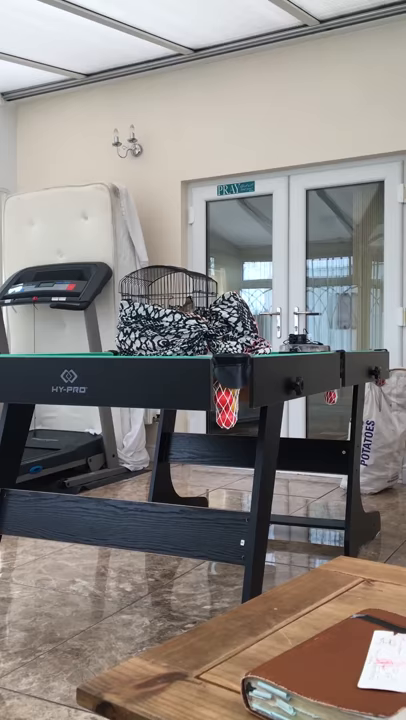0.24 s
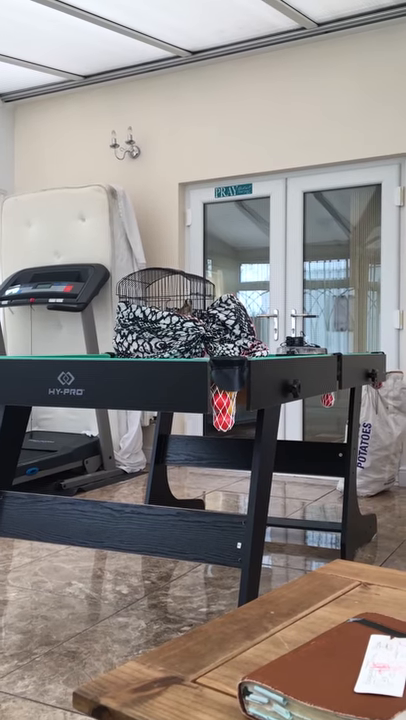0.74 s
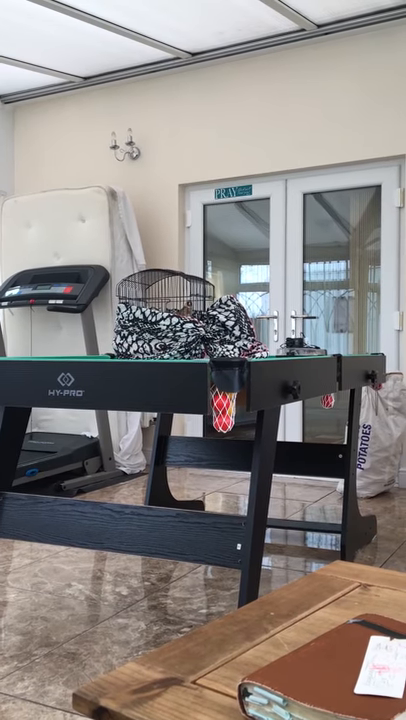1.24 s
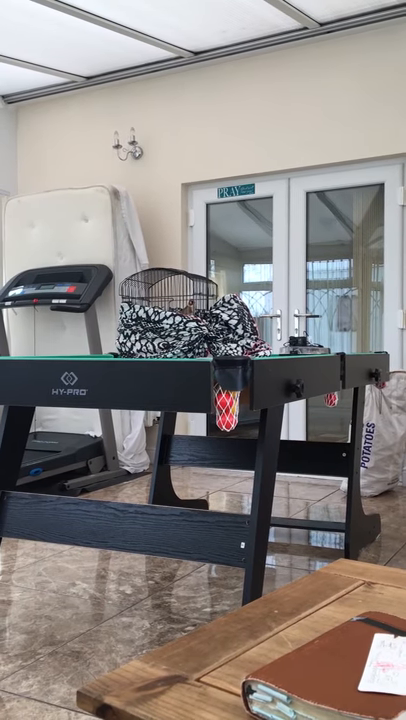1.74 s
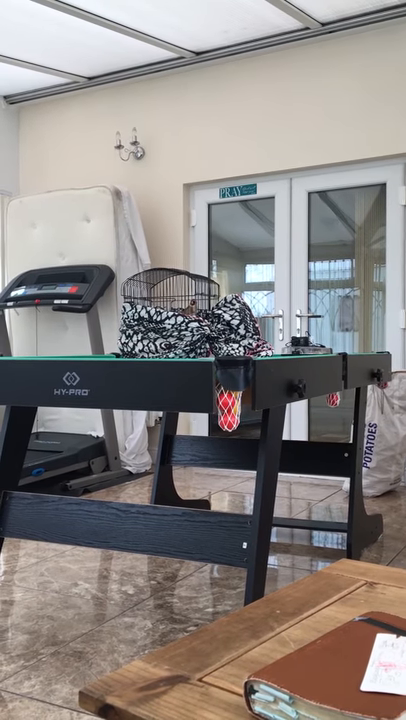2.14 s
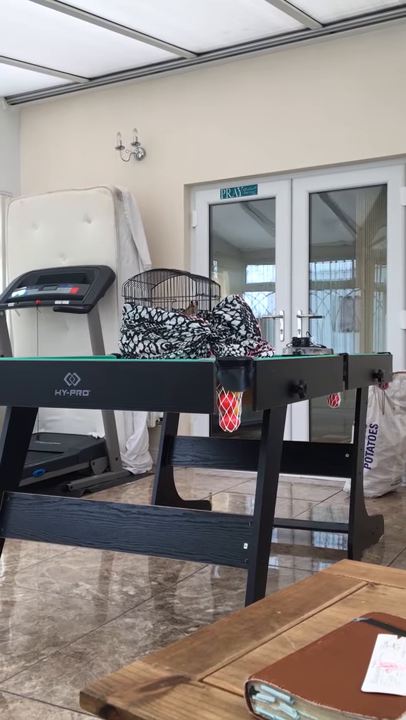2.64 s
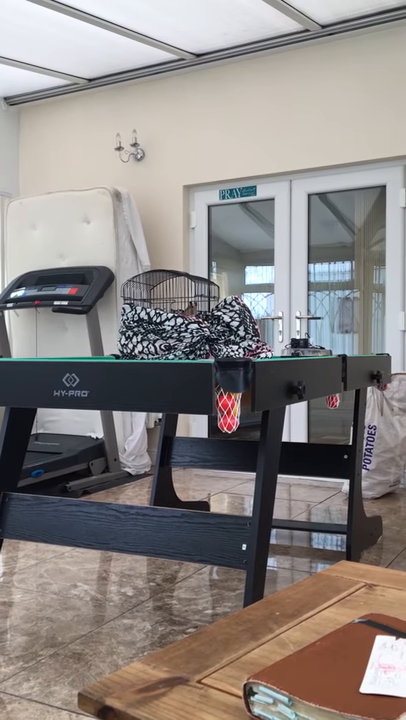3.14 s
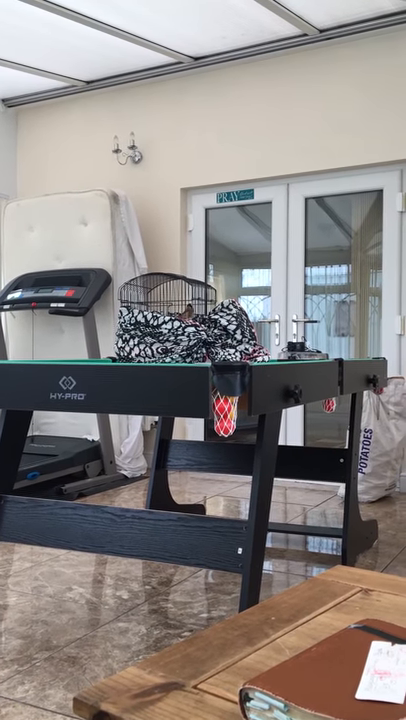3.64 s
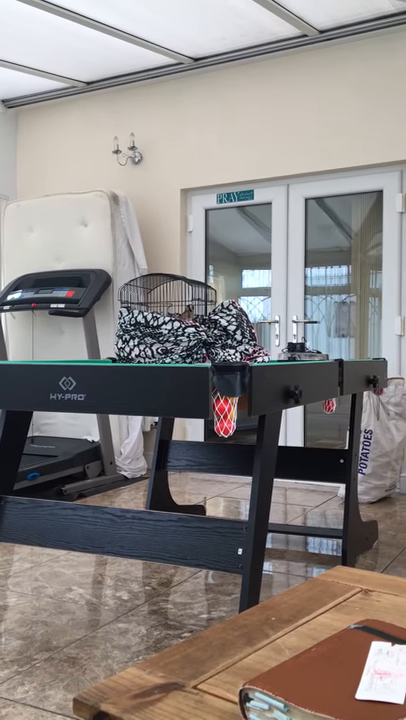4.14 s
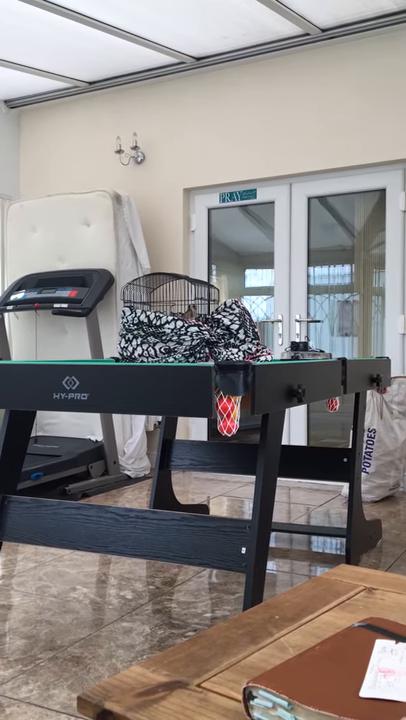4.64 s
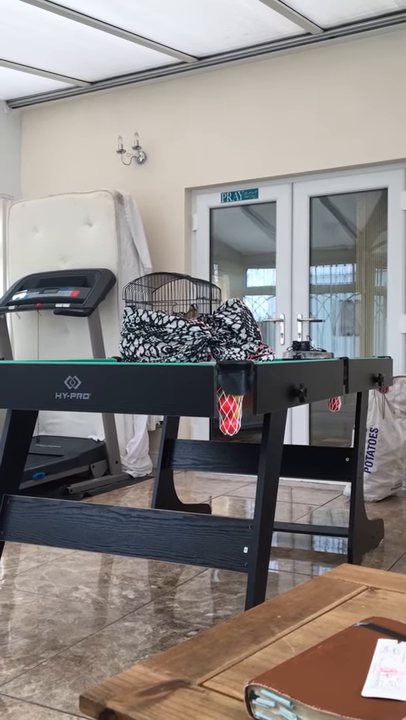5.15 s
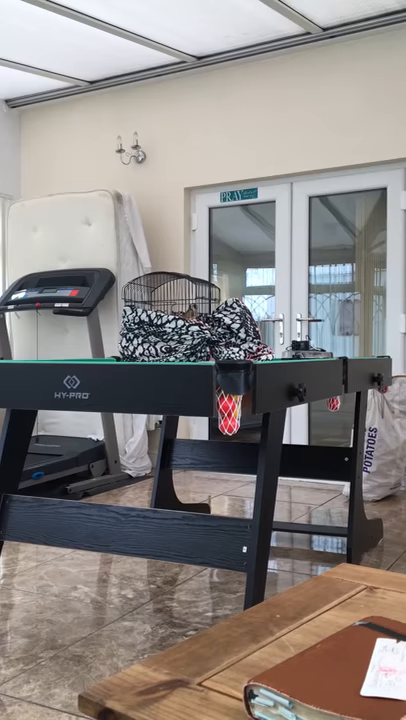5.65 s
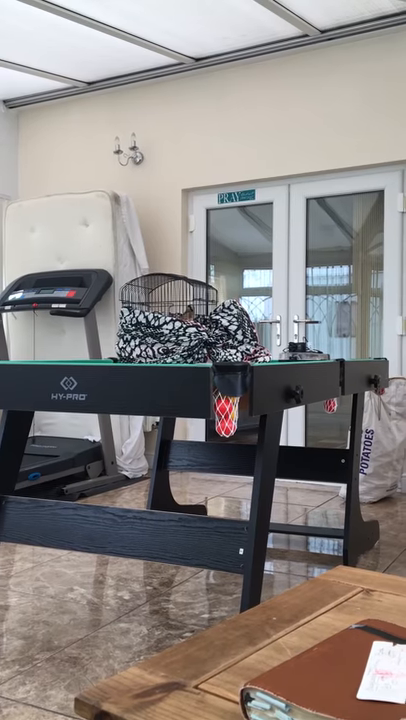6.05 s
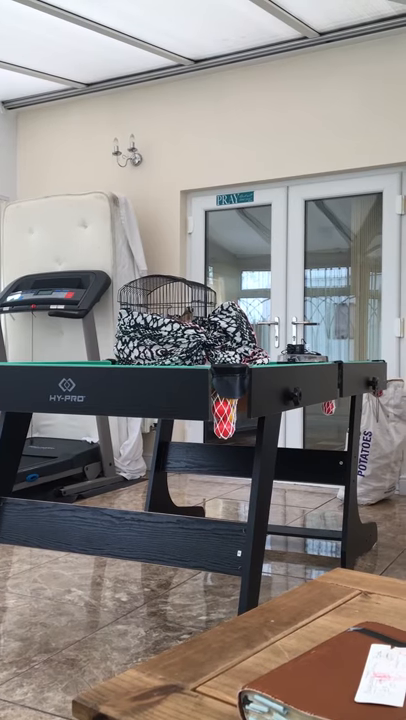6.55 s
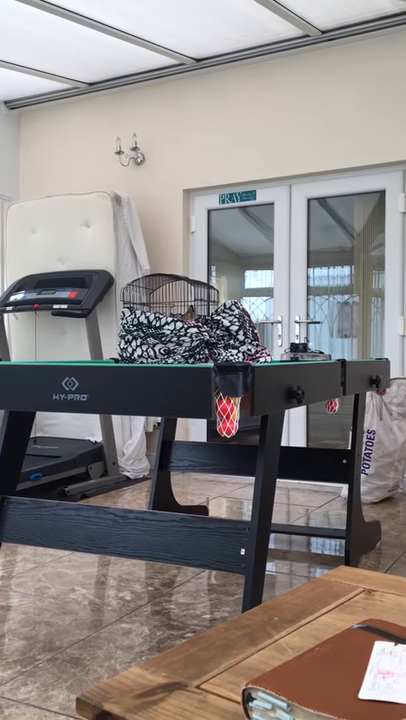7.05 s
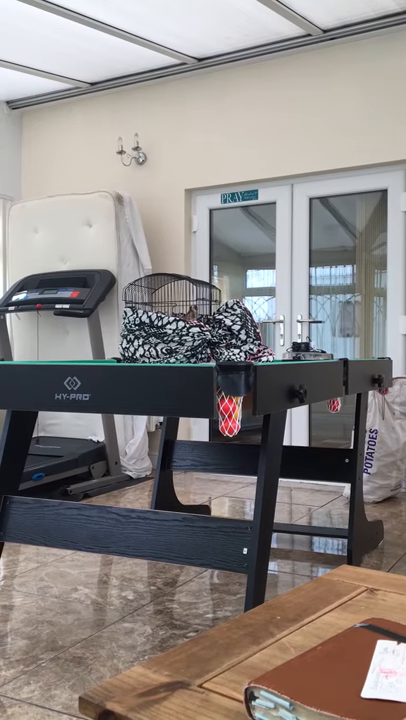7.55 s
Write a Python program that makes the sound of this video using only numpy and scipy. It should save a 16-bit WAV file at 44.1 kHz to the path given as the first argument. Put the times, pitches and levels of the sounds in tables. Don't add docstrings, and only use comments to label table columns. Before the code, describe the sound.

Lively, high-pitched finch twittering in changing bouts with tiny pauses: sparse chirps, four brief buzzes, a piercing pip, an even two-note trill, hoarse rasps and whistles. Midway, something dull knocks across the room. The song resumes with a longer buzz, repeated rolling syllables, falling churrs and a quick rattle. The bird is a few metres from a phone microphone, with bright short room echo, quiet low rumble, faint hum and distant traffic behind glass.

```python
import sys
import numpy as np
from scipy import signal
from scipy.fft import rfft, irfft
from scipy.io import wavfile
from scipy.ndimage import uniform_filter1d

SR = 44100
rng = np.random.default_rng(int(sys.argv[2]) if len(sys.argv) > 2 else 0)


def int16_out(signal):
    q = np.round(np.clip(np.atleast_2d(signal).T, -1, 1) * 32767)
    wavfile.write(sys.argv[1], SR, q.astype(np.int16))


def linear_from_db(decibels):
    return 10 ** (np.asarray(decibels, float) / 20)


N = 343098


def read(points, hz):
    point_hz, value = np.transpose(points)
    return np.interp(np.log(hz + 1), np.log(point_hz + 1), value)


def evened(x):
    return x / np.sqrt(np.mean(abs(x) ** 2) + 1e-20)


def add(mix, start_s, sound):
    part = mix[round(start_s * SR):][:len(sound)]
    part += sound[:len(part)]


def drift(size, seconds):
    width = int(seconds * SR)
    once = uniform_filter1d(rng.standard_normal(size), width)
    return evened(uniform_filter1d(once, width))


def coloured(shape, size):
    hz = np.fft.rfftfreq(size, 1 / SR)
    return evened(irfft(rfft(rng.standard_normal(size)) * linear_from_db(read(shape, hz)), size))


def spin(hz):
    return np.exp(2j * np.pi * np.cumsum(hz) / SR)


OVERTONES_DB = [-25.5, -36]
# pitch_hz, level_db
THROAT = [(1500, -3.5), (2500, -3), (3500, -1.5), (4700, 0), (6000, 1.5), (7500, -1), (9000, 0), (11500, 5),
          (13500, 3), (15500, -2.5)]


def finch():
    uneven = drift(N, 0.00347)
    voice = single_notes() + repeated_syllables() + warbled_notes(uneven) + buzzes(uneven)
    voice = voice * linear_from_db(1.1 * drift(N, .004))
    turn = voice / np.sqrt(uniform_filter1d(abs(voice) ** 2, size=132) + 1e-12)
    overtones = voice * (linear_from_db(OVERTONES_DB[0]) * turn + linear_from_db(OVERTONES_DB[1]) * turn ** 2)
    lowpass = signal.butter(N=8, Wn=16000, fs=SR, output="sos")
    sung = np.sqrt(2) * (voice.real + signal.sosfilt(lowpass, overtones.real))
    return irfft(rfft(sung) * linear_from_db(read(THROAT, np.fft.rfftfreq(N, 1 / SR))), N)


def glide(length, start_hz, end_hz, bend, db):
    edge_s = 0.001
    u = np.linspace(0, 1, max(round(length * SR), 16))
    hz = end_hz + (start_hz - end_hz) * (1 - u) ** bend
    puff = np.sin(np.pi * u) ** 0.57
    puff = puff * signal.windows.tukey(len(u), min(2 * edge_s / length, 1))
    return linear_from_db(db) * puff * spin(hz)


# start_s, length_s, start_hz, end_hz, level_db
FLICKS = [(.132, 0.048, 3040, 4300, -48), (.375, .029, 3400, 4820, -47), (.376, .012, 4800, 5680, -49),
          (1.606, 0.021, 1850, 3950, -45), (1.814, 0.021, 1870, 4040, -39), (1.945, 0.06, 2200, 3810, -47),
          (2.037, 0.013, 2930, 6600, -41.5), (4.348, 0.028, 6700, 12500, -56),
          (4.349, 0.011, 6300, 8300, -65), (4.462, 0.026, 2720, 3690, -34.5),
          (2.293, 0.017, 1510, 4860, -41), (2.357, .025, 4420, 8400, -38.5),
          (2.362, 0.036, 4650, 7000, -47), (3.654, 0.019, 2400, 4250, -39),
          (3.785, 0.024, 2640, 4720, -30.5), (3.838, 0.014, 5200, 7540, -42.5),
          (4.351, 0.034, 3220, 6600, -39.5), (4.347, 0.039, 4790, 6800, -45), (4.558, .12, 1924, 2510, -49),
          (5.082, 0.03, 5200, 5546, -37.5), (5.497, 0.043, 2240, 3110, -38.5),
          (5.734, 0.031, 5230, 5520, -33), (5.802, 0.021, 2320, 3190, -41), (5.821, 0.016, 2400, 3160, -38),
          (6.406, .014, 3000, 6000, -42), (7.581, 0.024, 5720, 5950, -45), (7.695, .03, 6180, 6540, -46)]
RISES = [(.113, 0.019, 2350, 3070, -63.5), (.027, 0.012, 3080, 5370, -51), (.239, 0.018, 4130, 5110, -44.5),
         (.48, 0.035, 2560, 4560, -46.5), (.593, 0.02, 3300, 4850, -38.5),
         (1.633, 0.024, 2910, 3950, -38.5), (1.832, 0.036, 3590, 5290, -34.5),
         (1.965, 0.014, 2980, 3510, -37.5), (2.299, 0.02, 3160, 5060, -32.5),
         (2.362, 0.041, 3250, 4770, -42.5), (2.365, 0.11, 2540, 3700, -52),
         (2.433, 0.0028, 3820, 6600, -36), (3.76, 0.027, 2130, 3110, -46.5),
         (4.714, 0.0134, 3030, 4980, -34.5), (4.828, 0.01, 2070, 5200, -38),
         (5.581, 0.019, 2750, 4920, -33.5), (5.576, 0.026, 4500, 8720, -58),
         (6.418, 0.015, 5940, 11900, -53.5), (6.433, 0.031, 6200, 7730, -40.5),
         (7.696, 0.018, 4440, 5310, -41), (7.694, 0.021, 8870, 10500, -55)]
DROPS = [(.881, .012, 3330, 2280, -56), (1.214, .016, 2990, 2110, -56), (1.379, .016, 2980, 2110, -54.5),
         (.697, 0.056, 5670, 4925, -38), (.689, 0.067, 6870, 6280, -39.5),
         (1.539, 0.025, 7160, 6000, -42.5), (1.543, 0.029, 5650, 4590, -43.5),
         (3.867, 0.097, 8540, 6170, -36), (4.769, 0.018, 7640, 6530, -36.5),
         (5.632, 0.052, 8300, 6270, -36.5), (5.636, 0.057, 6300, 5070, -50.5),
         (5.731, 0.03, 4770, 4410, -40)]
SLIDES = [(.238, 0.029, 5730, 5930, -55), (.642, 0.031, 8170, 7860, -48.5),
          (1.701, 0.0246, 2530, 2770, -49.5), (1.773, .011, 5600, 5880, -48),
          (1.772, 0.011, 7220, 7260, -48), (4.372, 0.019, 6480, 6560, -36),
          (2.365, 0.039, 1350, 1210, -61.5), (2.451, .11, 4690, 4094, -40), (2.455, .14, 9280, 8010, -46.5),
          (2.466, .115, 7930, 6440, -47.5), (2.478, .12, 3180, 2200, -55.5),
          (5.125, 0.072, 5500, 5470, -47), (3.607, .03, 2410, 1900, -49), (3.611, 0.028, 4660, 3880, -52.5),
          (4.77, 0.032, 5800, 5500, -51), (7.578, 0.019, 6620, 7000, -42), (7.584, 0.019, 7640, 8020, -66)]
SCOOPS = [(2.027, 0.017, 1880, 4800, -49.5), (2.027, .015, 3500, 9800, -44),
          (2.027, .014, 5800, 12000, -51)]


def single_notes():
    voice = np.zeros(N, complex)
    for notes, bend in ((FLICKS, 2.2), (RISES, 1.15), (DROPS, 2.9), (SLIDES, 1.05), (SCOOPS, .3)):
        for start_s, length, start_hz, end_hz, db in notes:
            add(voice, start_s, glide(length, start_hz, end_hz, bend, db))
    return voice


def fan():
    length_s, from_hz, to_hz = .036, 620, 1080
    return [(0, length_s, k * from_hz, k * to_hz, -51 - 1.22 * k) for k in range(3, 12)]


TRILL = [(0, 0.0076, 8020, 6340, -34.5)]
TRILL_LOW = [(.013, .022, 4030, 2758, -33.5)]
TRILLED = [(2.6663, -1.3, 1.038), (2.7383, -1, 1.015), (2.8092, -0.5, 1.015), (2.882, -1, 1.013),
           (2.9517, -1.5, 1.045), (3.023, 0.2, 1.02), (3.0955, 0.79, 1.033), (3.1701, 0.3, 1.033)]
ROLL_UP = [(0.00023, 0.0107, 3600, 6690, -35)]
ROLL_DOWN = [(.023, 0.0354, 3760, 3150, -41), (0.036, 0.0255, 6080, 5320, -36.5),
             (0.07, 0.0171, 4700, 4340, -47), (.075, 0.027, 4330, 4190, -34.5),
             (.067, 0.0242, 2840, 2560, -47.5), (.041, 0.019, 2610, 2210, -53),
             (.076, 0.01, 1800, 1790, -59.5)]
ROLLED = [(5.878, -0.91, 0.97), (6.015, -0.21, 1.02), (6.148, 0.24, 1.0), (6.282, 1.6, 0.99)]
KINK = [(.092, 0.011, 5060, 4410, -30.5)]
FALL = [(.108, 0.036, 4130, 3103, -37.5), (.124, 0.0172, 3400, 2780, -40.5),
        (.143, 0.01087, 3050, 2200, -53.5)]
FALLEN = [(6.556, 0.016, 0.98), (6.786, 0, 0.96)]
RATTLE = [(0, 0.0212, 2716, 1554, -48), (0, 0.0153, 5110, 3250, -47)]
RATTLED = [(7.003, -2.5, 0.92), (7.053, -0.5, 1), (7.1, 1, 0.96), (7.144, 1.5, 1.03), (7.195, 0.5, 0.98)]
UPSWEEP = [(0.001, 0.0045, 5650, 12000, -48)]
UPSWEPT = [(5.18, 0, 1.0), (5.195, -4, 1.1), (5.21, -4, 1.05), (5.226, -4, 1.0), (5.243, -3, 1.1),
           (5.26, -5, 1.12)]
FANNED = [(7.261, 0, 0.95)]


def repeated_syllables():
    voice = np.zeros(N, complex)
    songs = ((TRILL, TRILLED, 2.26), (TRILL_LOW, TRILLED, 1.15), (ROLL_UP, ROLLED, 2.2),
             (ROLL_DOWN, ROLLED, 1.2), (KINK, FALLEN, 2.9), (FALL, FALLEN, 1.086),
             (RATTLE, RATTLED, 1.06), (UPSWEEP, UPSWEPT, 1.15), (fan(), FANNED, 2.2))
    for syllable, repeats, bend in songs:
        for start_s, gain_db, factor in repeats:
            for after, length, start_hz, end_hz, db in syllable:
                note = glide(length, start_hz * factor, end_hz * factor, bend, db + gain_db)
                add(voice, start_s + after, note)
    return voice


def held(rate, rows, uneven):
    times, *columns = np.transpose(rows)
    t = np.arange(times[0], times[-1], 1 / SR)
    hz, db, swing = (np.interp(t, times, c) for c in columns)
    wobble = uneven[round(times[0] * SR):][:len(t)]
    beat = np.cos(2 * np.pi * np.cumsum(rate * (1 + 0.1414 * wobble)) / SR)
    ends = signal.windows.tukey(len(t), min(0.004 * SR / len(t), 1))
    level = linear_from_db(db + 3.2 * beat * swing / 600) * ends
    return level * spin(hz + swing * (beat + 0.324 * wobble))


# start_s, length_s, start_hz, end_hz, level_db
RASPS = [(2.46, .13, 8100, 4900, -56), (2.7, 0.13, 10800, 9700, -52.5), (3.325, 0.2, 8500, 6600, -51.5),
         (3.31, 0.2, 7000, 5750, -53), (3.299, 0.22, 10500, 8700, -64.5), (3.295, .225, 4300, 2720, -49.5),
         (3.318, 0.17, 1190, 1310, -61)]


def rasp(start_s, length, start_hz, end_hz, db):
    middle, sag = .45, .75
    swing_share, least_swing_hz = 0.098, 293
    hz = np.array([start_hz, start_hz + sag * (end_hz - start_hz), end_hz])
    times = start_s + length * np.array([0, middle, 1])
    levels = db + np.array([-1, 0, -6])
    return np.transpose([times, hz, levels, np.maximum(swing_share * hz, least_swing_hz)])


# warble_hz, then rows of time_s, pitch_hz, level_db
HELD = [
    (27.8, [(2.068, 5890, -43), (2.1, 5450, -36.5), (2.145, 5314, -31.5), (2.165, 5130, -30), (2.2, 5110, -31.5), (2.225, 5080, -46)]),
    (126, [(3.33, 5160, -54), (3.37, 4490, -44), (3.45, 4134, -46.5), (3.53, 3920, -57)]),
    (220, [(3.279, 5660, -45), (3.3, 5410, -47), (3.327, 5330, -46)]),
    (29.8, [(3.65, 1974, -57), (3.668, 5520, -39), (3.68, 5527, -25), (3.715, 5480, -79)]),
    (304, [(4.0, 4450, -40), (4.05, 3860, -38), (4.09, 3155, -42), (4.13, 2274, -48.5), (4.23, 2350, -44.5)]),
    (60, [(4.88, 2190, -51.5), (4.945, 3410, -53), (4.975, 3660, -38.5), (5.003, 4040, -37.5), (5.022, 4560, -35.5), (5.045, 4680, -51)]),
    (21, [(7.292, 4470, -54), (7.32, 4170, -38.5), (7.355, 4040, -37), (7.4, 4010, -40.5), (7.447, 3815, -51)]),
]
# place_0_to_1, pitch_hz, level_db
CHURR = [(0, 7890, -42.5), (0.319, 6420, -38), (.72, 6200, -36.5), (1, 5460, -31.5)]
# start_s, length_s
CHURRED = [(6.554, .094), (6.772, .106)]


def warbled_notes(uneven):
    whistle_per_s, rasp_per_s, churr_per_s = 90, 110, 190
    churr_swing_hz = 536
    notes = [(whistle_per_s, [(*row, swing) for row in rows]) for swing, rows in HELD]
    notes += [(rasp_per_s, rasp(*row)) for row in RASPS]
    for start_s, length in CHURRED:
        rows = [(start_s + place * length, hz, db, churr_swing_hz) for place, hz, db in CHURR]
        notes.append((churr_per_s, rows))
    voice = np.zeros(N, complex)
    for rate, rows in notes:
        add(voice, rows[0][0], held(rate, rows, uneven))
    return voice


def buzz(shape, rows, uneven):
    rate, share, top_at, second_db, push_db = shape
    times, *columns = np.transpose(rows)
    t = np.arange(times[0], times[-1], 1 / SR)
    top_hz, foot_hz, db = (np.interp(t, times, c) for c in columns)
    phase = rate * (t - times[0]) % 1
    u = np.minimum(phase / share, 1)
    arch = 1 - ((u - top_at) / max(top_at, 1 - top_at)) ** 2
    rise_hz = (top_hz - foot_hz) * arch
    shake = 1 + 0.0169 * uneven[round(times[0] * SR):][:len(t)]
    upper = spin((foot_hz + rise_hz) * shake)
    lower = spin((foot_hz + .58 * rise_hz) * shake)
    sides = upper + linear_from_db(second_db) * lower
    sides = sides + linear_from_db(-20.5) * sides ** 2
    puff = linear_from_db(db + push_db * (arch - 0.5)) * np.sin(np.pi * u) ** 0.42
    v = np.clip((phase - share) / (1 - share), 0, 1)
    hook = np.sin(np.pi * v) * spin(foot_hz * (1 + .55 * (1 - v) ** 2))
    return linear_from_db(db - 12) * hook + puff * sides


# start_s, length_s, top_level_db, start_db under the top, second_side_db
BUZZED = [
    (0.875, 0.1, -42, -6, -1),
    (1.018, 0.12, -34, -13, -3.5),
    (1.208, 0.099, -34, -5, -1),
    (1.372, 0.098, -34.5, -6, 0),
]


def short_buzz(start_s, length, db, start_db, second_db):
    top_hz, end_top_hz, foot_hz, end_foot_hz = 6740, 6600, 2200, 2615
    rows = [(start_s, top_hz, foot_hz, db + start_db),
            (start_s + 0.65 * length, top_hz, end_foot_hz, db),
            (start_s + length, end_top_hz, end_foot_hz, db - 6.5)]
    arches_per_s = 71.5 - 5.5 * (start_s - BUZZED[0][0])
    share, top_at, push_db = .5, .47, -2
    return (arches_per_s, share, top_at, second_db, push_db), rows


# (arches_per_s, share_0_to_1, top_at_0_to_1, second_side_db, push_db),
# then rows of time_s, top_hz, foot_hz, level_db
LONG_BUZZ = ((65.5, 0.5, 0.65, -10, 2.5), [(5.179, 6870, 2126, -45.5), (5.27, 6860, 2727, -41.5),
             (5.34, 6830, 3163, -36), (5.39, 7190, 3247, -36), (5.44, 7530, 3255, -39.5)])


def buzzes(uneven):
    voice = np.zeros(N, complex)
    for shape, rows in [short_buzz(*row) for row in BUZZED] + [LONG_BUZZ]:
        add(voice, rows[0][0], buzz(shape, rows, uneven))
    return voice


# centre_s, half_width_s, pitch_hz, level_db
PIP = (2.2405, .0042, 5100, -17)


def pip():
    centre_s, width, hz, db = PIP
    t = np.arange(N) / SR - centre_s
    return linear_from_db(db) * np.exp(-.5 * (t / width) ** 2) * np.sin(2 * np.pi * hz * t)


# start_s, level_db
KNOCK = [
    (0.164, -69),
    (3.929, -30.5),
]
# pitch_hz, level_db, t60_s
KNOCK_RINGS = [(168.8, -0.5, 0.32), (247.5, -4, 0.099), (310.7, 6.5, .15), (402, 4, 0.16), (482, 2.5, 0.14),
               (595, 4, 0.1), (705, 2.5, 0.13), (835, 10, 0.091), (953, 6, 0.096), (1109, 11, 0.15),
               (1273, 1, .11), (1453, 3.5, 0.14), (1718, 1.5, 0.086), (1930, 7.5, 0.089)]
# pitch_hz, level_db
KNOCK_CRACK = [(100, -53), (250, -12), (1000, -13), (3000, -16.5), (6000, -28), (10000, -34), (15000, -31)]


def knock():
    swell_s, grain_s = .014, .005
    out, t = np.zeros(N), np.arange(SR // 3) / SR
    rings = np.zeros(len(t))
    for hz, db, t60 in KNOCK_RINGS:
        rough = 0.78 + drift(len(t), grain_s)
        rings += linear_from_db(db - 60 * t / t60) * rough * np.sin(2 * np.pi * (hz * t + rng.random()))
    crack = coloured(KNOCK_CRACK, len(t)) * linear_from_db(-60 * t / 0.12)
    swell = .15 + np.minimum(t / swell_s, 1) ** 2
    rings = rings * swell
    blow = rings / abs(rings).max() + linear_from_db(-2.0) * swell * crack
    for start_s, db in KNOCK:
        add(out, start_s, linear_from_db(db) * blow)
    return out


# pitch_hz, t60_s
ROOM_T60 = [(300, 0.55), (2000, 0.45), (5000, 0.31), (9000, 0.24), (15000, 0.2)]
# delay_s, level_db
ECHOES = [(.0019, -14), (.0037, -15), (.0059, 0), (.0072, -2.5), (.0084, -11), (.0094, -16), (.0139, -10),
          (.0168, -10)]


def room(x, tail_db):
    taps = np.zeros(SR)
    at = np.arange(500, SR - 22, 22)
    taps[at + rng.integers(0, 22, len(at))] = rng.choice([-1., 1.], len(at))
    hz, t, z = signal.stft(taps, SR, nperseg=256)
    dying = linear_from_db(-60 * t / read(ROOM_T60, hz)[:, None])
    tail = signal.istft(z * dying, SR, nperseg=256)[1][:SR]
    answer = linear_from_db(tail_db) * tail / np.linalg.norm(tail)
    answer[0] = 1
    for delay_s, db in ECHOES:
        add(answer, delay_s, np.array([linear_from_db(db)]))
    return signal.fftconvolve(x, answer)[:N]


# pitch_hz, level_db per Hz
AIR = [(18, -62), (30, -2.5), (40, 5), (96, 0), (198, -3), (482, -16), (945, -22), (1570, -27), (2500, -30),
       (5000, -37), (9000, -38), (15500, -42)]
# pitch_hz, level_db rms
HUM = [(100, -64.5), (143, -67), (199.2, -64.5), (305, -73.5), (970, -84)]
# pitch_hz, level_db per Hz
STREET = [(250, 2), (400, 4), (650, -13), (1000, -1.5), (1300, -8), (1900, -27.5)]
# nearest_s, level_db there, reach_s to fall off by 10 dB
PASSING = [(1.0, -59, 0.75), (2.5, -63, 0.77), (3.65, -59, 0.4), (4.55, -60.5, 0.32), (5.6, -58.5, -1.32),
           (6.72, -62, -0.2), (7.9, -91, 1)]


def air():
    t = np.arange(N) / SR
    bed = linear_from_db(-56 + 0.37 * drift(N, 0.27)) * coloured(AIR, N)
    waver = np.cumsum(1 + 0.00629 * drift(N, 0.0908)) / SR
    hum = np.zeros(N)
    for hz, db in HUM:
        hum += linear_from_db(db + 0.81 * drift(N, 0.22)) * np.sqrt(2) * np.sin(2 * np.pi * hz * waver)
    near = sum(linear_from_db(db - 10 * ((t - nearest_s) / reach) ** 2) for nearest_s, db, reach in PASSING)
    street = near * linear_from_db(1.5 * drift(N, 0.074) - 6) * coloured(STREET, N)
    return bed + hum + street


def scene():
    bird = room(linear_from_db(-4) * finch(), tail_db=2.5)
    aimed = pip() + linear_from_db(-20) * room(pip(), tail_db=4.5)
    blow = knock()
    struck = blow + linear_from_db(-8.5) * room(blow, tail_db=6.0)
    return (bird + aimed + struck + air())[None]


def band_limit(x):
    return signal.sosfilt(signal.butter(12, 15760, fs=SR, output="sos"), x)


def record(dry):
    edge = signal.firwin(255, 15700, window=("kaiser", 9), fs=SR)
    heard = signal.oaconvolve(dry, edge[None], "same")
    return band_limit(heard)


dry = scene()
out = record(dry)
int16_out(out)
```